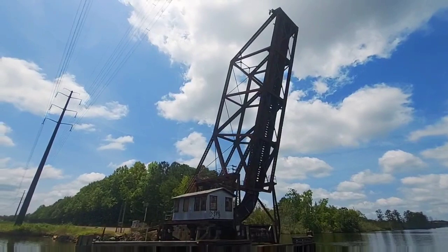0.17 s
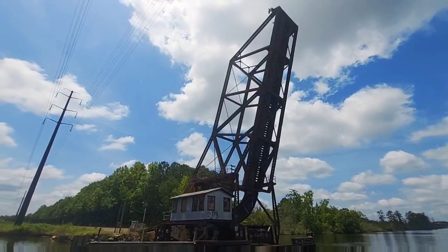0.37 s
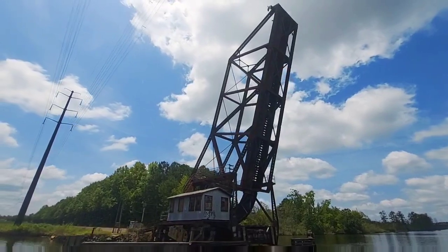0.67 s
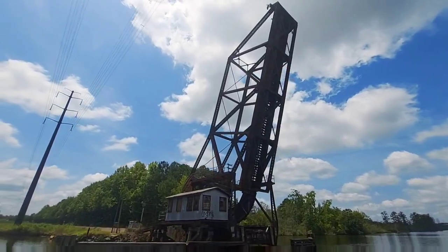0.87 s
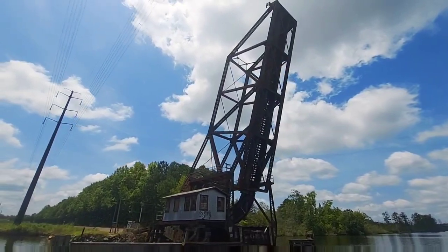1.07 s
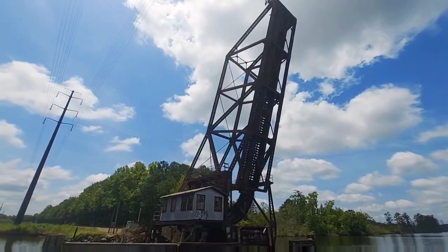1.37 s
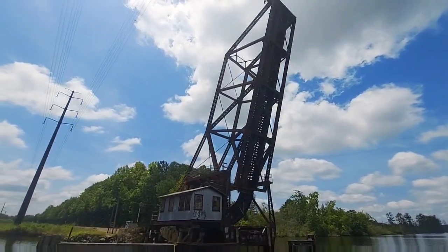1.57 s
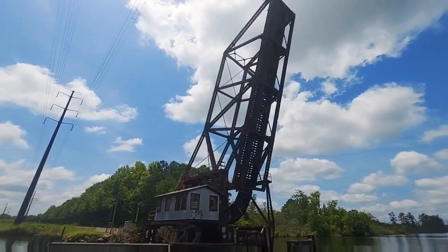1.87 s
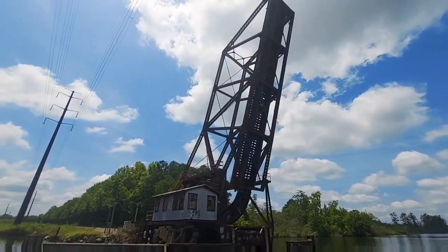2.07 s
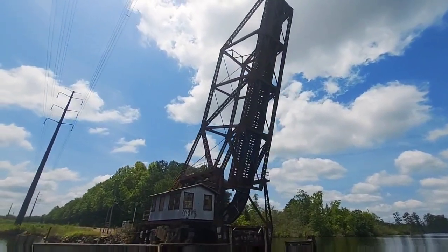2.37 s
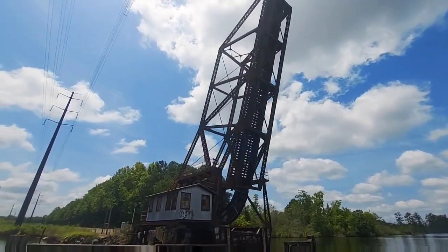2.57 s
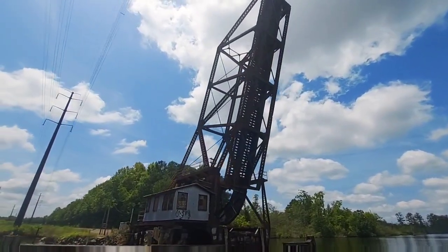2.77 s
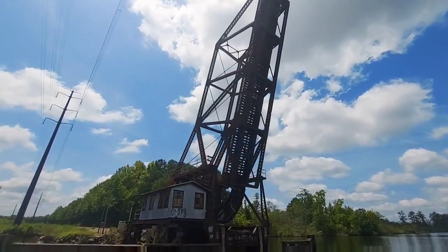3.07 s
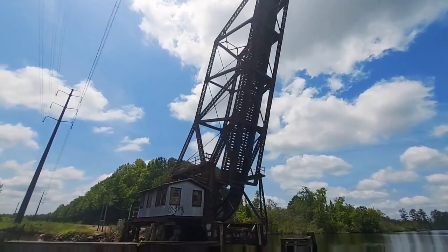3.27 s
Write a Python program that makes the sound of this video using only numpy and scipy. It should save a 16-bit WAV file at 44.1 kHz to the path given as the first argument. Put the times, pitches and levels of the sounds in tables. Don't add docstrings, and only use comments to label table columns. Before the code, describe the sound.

A steady motorboat engine clatter under lumpy low wind rumble, with faint fizzing water behind.

```python
import sys
import numpy as np
from scipy import signal
from scipy.fft import rfft, irfft
from scipy.io import wavfile
from scipy.ndimage import uniform_filter1d

SR = 44100
rng = np.random.default_rng(int(sys.argv[2]) if len(sys.argv) > 2 else 0)


def dump(signal):
    limited = np.clip(np.atleast_2d(signal).T, -1, 1)
    pcm = np.round(limited * 32767).astype(np.int16)
    wavfile.write(sys.argv[1], SR, pcm)


def convert_level_to_amplitude(level_db):
    exponent = np.asarray(level_db, float) / 20
    return 10 ** exponent


N = 150822

# time in seconds, pitch of the 18th firing order in Hz.
ENGINE_SPEED = [(0, 1180.5), (1.2, 1180), (2.2, 1178), (3.42, 1179)]
# multiple of the firing rate, left level in dB, right level in dB.
FIRING_TONES = [(1, -48, -55), (2, -48, -60), (3, -42.5, -58), (4, -48.5, -57.5), (5, -56, -59.5),
                (7, -63, -63), (8, -63, -67), (9, -66, -63), (18, -57.5, -73), (19, -74, -73),
                (21, -76, -75), (22, -59, -75), (23, -61.5, -76)]
# multiple of the firing rate, left level in dB, right level in dB.
GEAR_TONES = [(3.5, -62, -67), (6.26, -68, -64), (16.25, -75, -72), (21.75, -70, -80), (23.75, -77, -73),
              (26.14, -76, -68), (27.26, -80, -73), (28.26, -80, -70), (35.05, -78, -72), (41.13, -84, -72)]
# pitch in Hz, left dB per Hz, right dB per Hz.
EXHAUST_ROAR = [(25, -76, -86), (60, -58, -72), (120, -56, -66), (160, -58, -73), (380, -69, -69),
                (620, -68.5, -71), (850, -75, -78), (2500, -130, -130)]
# pitch in Hz, left dB per Hz, right dB per Hz.
CLATTER = [(388, -100, -100), (993, -69.5, -72.5), (1500, -73.5, -74.5), (2400, -83.5, -77),
           (3136, -84, -78), (4170, -100, -91.5), (5900, -105, -105), (9000, -150, -150)]
# pitch in Hz, width in Hz, left boost in dB, right boost in dB.
CASING_RINGS = [(1060, 140, -4, -4), (1190, 70, 3, 3), (1320, 100, -2, -1), (1690, 110, 3, 5),
                (1920, 110, -1, -3), (2100, 200, 2, 6), (2230, 80, 1, 3), (2460, 150, 8, 6),
                (2560, 60, 3, 3), (2950, 130, 7, 4)]
# time in seconds, extra force in dB.
HARD_KNOCKS = [(.098, 4), (.219, 4), (.386, 4), (.706, 6), (1.163, 4), (1.179, 5), (1.271, 4), (1.315, 5),
               (1.332, 6), (1.423, 5), (1.789, 4), (2.293, 3), (2.705, 3), (2.797, 4), (3.041, 5),
               (3.209, 4)]
# pitch in Hz, left dB per Hz, right dB per Hz.
WAKE_HISS = [(2430, -105, -105), (4300, -85.5, -86), (5000, -93, -82), (5850, -90.5, -82),
             (6480, -94.5, -87), (7430, -89.5, -90.5), (8750, -101, -105), (12000, -135, -140)]
# pitch in Hz, left dB per Hz, right dB per Hz.
SPRAY_FIZZ = [(6000, -120, -125), (8600, -102, -108), (10600, -100, -109), (11500, -98.5, -112),
              (13600, -97.5, -111), (16600, -101, -123), (15400, -150, -160)]
# time in seconds, level in dB.
SPRAY_STRENGTH = [(0, -77), (.25, -81.5), (.45, -79.5), (.68, -74.5), (.9, -80.5), (1.07, -75.5),
                  (1.35, -82), (1.9, -78), (2.2, -75), (2.58, -77), (2.85, -81.5), (3.0, -75.5),
                  (3.15, -78.5), (3.25, -74), (3.42, -73)]
# time in seconds, peak level in dB, pitch in Hz.
DROPS = [(.046, -66, 10500), (.439, -57, 12500), (0.796, -43, 6750), (1.064, -61, 12100),
         (1.711, -57, 14800), (1.727, -61, 11800), (2.084, -53, 6760), (2.139, -61, 12400),
         (2.598, -52, 14500), (2.976, -61, 13000), (3.047, -65, 10500), (3.081, -60, 12200),
         (3.203, -59, 11500), (3.406, -62, 12000)]
# pitch in Hz, left minus right in dB.
DROP_SIDE = [(2300, -8), (6000, -4), (7200, 8), (11000, 16)]
# middle in seconds, half length in seconds, pitch in Hz, level in dB.
GURGLE = (.25, .035, 520, -36.5)
# pitch in Hz, dB per Hz.
WIND_THUMP = [(20, -46), (45, 5), (75, 7), (135, 6), (190, -13), (300, -22.5), (500, -70), (900, -96)]
# pitch in Hz, left dB per Hz, right dB per Hz.
WIND_EDGE = [(60, -25, -20), (150, -8, -6), (220, 0, 0), (330, -6, -2), (450, -11, -4), (580, -22, -10),
             (750, -36, -32), (1200, -60, -60)]
# time in seconds, level in dB.
BREEZE = [(0, -16), (.15, -25.5), (.26, -25.5), (.44, -23.5), (.58, -26.5), (.8, -27.5), (1.1, -19.5),
          (1.25, -28.5), (1.45, -23), (1.62, -24.5), (1.75, -23), (2.1, -24), (2.35, -21), (2.55, -25),
          (2.82, -31), (3.0, -22.5), (3.2, -15), (3.42, -14)]
# middle in seconds, length in seconds, level in dB, pitch of the swing in Hz.
LEFT_GUSTS = [(.024, 0.01, -12.5, 111), (.085, 0.014, -12, 97), (.125, 0.028, -14.5, 119),
              (3.415, 0.013, -8, 140.5), (.298, 0.0091, -9, 124), (.345, 0.022, -15.5, 74),
              (.365, 0.023, -4.5, 100.5), (.388, 0.021, -6, 122), (.51, 0.0066, -7.5, 157),
              (.527, .022, -9, 69), (.552, 0.014, -13, 75), (.623, 0.0073, -13, 122),
              (.648, .02, -17.5, 85.5), (.708, 0.034, -14.5, 139), (.77, 0.0064, -13.5, 119),
              (.89, 0.022, -11.5, 104), (.954, 0.012, -12, 101), (1.022, 0.022, -10, 108),
              (1.05, 0.017, -14.5, 123), (1.278, .01, -14, 149), (1.298, 0.017, -9.5, 146),
              (1.321, 0.016, -5.5, 81), (1.415, 0.01, -10, 113), (1.465, 0.02, -9, 114),
              (1.482, 0.023, -12.5, 139), (1.51, 0.0074, -9, 207), (1.549, 0.021, -3.5, 124),
              (1.563, 0.014, -4, 84), (1.583, 0.02, -8.5, 129), (1.775, 0.029, -16.5, 139),
              (1.935, 0.022, -13.5, 125), (2.115, 0.023, -17.5, 168), (2.24, 0.035, -15, 121),
              (2.278, 0.01, -13, 87), (2.352, 0.006, -21, 90), (2.385, 0.022, -10.5, 97),
              (2.415, 0.02, -9, 100), (2.442, 0.018, -18, 173), (2.712, 0.041, -10, 130),
              (2.749, 0.016, -5.5, 73), (2.9, 0.007, -19, 150), (3.11, 0.0064, -6.5, 120),
              (3.139, 0.0073, 0.5, 178), (3.16, .018, 3, 93), (3.187, 0.012, -8, 172),
              (3.231, 0.0095, 0.5, 162), (3.249, 0.015, 1.5, 78.5), (3.285, 0.029, -7.5, 108),
              (3.332, 0.021, -7.5, 195.4), (3.37, 0.017, -2, 81)]
# middle in seconds, length in seconds, level in dB, pitch of the swing in Hz.
RIGHT_GUSTS = [(.53, .06, -40, 65), (.6, .04, -44, 130), (1.19, .08, -38, 95), (2.18, .03, -40, 50),
               (2.26, .09, -35, 90), (2.985, .04, -23, 80), (3.03, .045, -21, 115), (3.065, .03, -27, 190),
               (3.082, .03, -27, 340), (3.145, .07, -28, 110), (3.203, .018, -22, 210),
               (3.21, .03, -29, 400), (3.295, .04, -33, 260), (3.33, .025, -26, 480), (3.34, .05, -30, 80)]
# start in seconds, depth of the drop in dB.
GAIN_DROPS = [
    (.39, -0.84),
    (1.59, 1.5),
    (3.16, 1.5),
]

LAG_S = .00036


def curve(points):
    times, values = np.transpose(points)
    return np.interp(np.arange(N) / SR, times, values)


def evened(x):
    return x / np.sqrt(np.mean(x ** 2) + 1e-20)


def colour(x, table, col=1):
    p = np.array(table)
    hz = np.fft.rfftfreq(N, 1 / SR)
    db = np.interp(np.log(hz + 1), np.log(p[:, 0] + 1), p[:, col])
    return irfft(rfft(x) * convert_level_to_amplitude(db) * np.sqrt(SR / 2), N)


def slow(rate_hz):
    t = np.arange(N // 64 + 2) * 64 / SR
    f = np.geomspace(rate_hz / 15, rate_hz, num=24)[:, None]
    waves = np.sin(2 * np.pi * (f * t + rng.random((24, 1)))) / np.sqrt(f)
    return np.interp(np.arange(N) / SR, t, evened(waves.sum(0)))


def ports(a, b, same):
    left = same * a + np.sqrt(1 - same ** 2) * b
    return left, np.roll(a, round(LAG_S * SR))


def patchy(x, patch_db, flicker_db):
    z = signal.stft(x, nperseg=256)[2]
    p = rng.standard_normal(z.shape[::-1]).T
    patches = evened(uniform_filter1d(uniform_filter1d(p, size=7, axis=0), size=18, axis=1))
    flicker = evened(p.mean(0))
    return signal.istft(z * convert_level_to_amplitude(patch_db * patches + flicker_db * flicker), nperseg=256)[1][:N]


def engine_tones(firings):
    out = np.zeros((2, N))
    firing_hz = firings[-1] * SR / N
    for k, left_db, right_db in FIRING_TONES + GEAR_TONES:
        wander = .045 * (1 + k / 30) * slow(15.0)
        phase = 2 * np.pi * (k * firings + rng.random() + wander)
        lag = 2 * np.pi * k * LAG_S * firing_hz * (k > 10 and k % 1 == 0)
        level = convert_level_to_amplitude(9.7 + 1.7 * slow(50) + [[left_db], [right_db]])
        out += level * np.sqrt(2) * np.sin([phase, phase - lag])
    return out


def firing_bursts(firings):
    turns = firings + 1 - .2
    force_db = 1.5 * rng.standard_normal(N // 400)
    for s, extra_db in HARD_KNOCKS:
        force_db[int(turns[round((s + .002) * SR)])] = extra_db
    cycle_db = 1.0 * np.cos(np.pi * np.floor(turns) / 3)
    force = convert_level_to_amplitude(force_db)[turns.astype(int)] * convert_level_to_amplitude(cycle_db)
    burst = evened(np.exp(-(turns % 1) / .35))
    share = .42
    return evened(1 - share + share * force * burst)


def engine():
    firings = np.cumsum(curve(ENGINE_SPEED) / 18) / SR
    out = engine_tones(firings)
    gate = firing_bursts(firings)
    a, b, c, d = rng.standard_normal((N, 4)).T
    hz = np.fft.rfftfreq(N, 1 / SR)
    upper = 1 / (1 + (1800 / (hz + 1)) ** 8)

    def knocking(noise):
        return irfft(np.sqrt(upper) * rfft(noise * gate) + np.sqrt(1 - upper) * rfft(noise[::-1]), N)

    knocks = ports(patchy(knocking(a), 1.1, 0.5), patchy(knocking(b), 1.1, 1.0), .6)
    roars = 0.47 * c + 0.92 * d, c
    for ch in (0, 1):
        ring_db = 0
        for row in CASING_RINGS:
            ring_db = ring_db + row[2 + ch] / (1 + (2 * (hz - row[0]) / row[1]) ** 2)
        clatter = colour(knocks[ch], CLATTER, col=1 + ch)
        out[ch] += irfft(rfft(clatter) * convert_level_to_amplitude(ring_db), N)
        out[ch] += colour(roars[ch], EXHAUST_ROAR, col=1 + ch)
    return out


def foam():
    a, b, c, d = rng.standard_normal((N, 4)).T
    tick_size = convert_level_to_amplitude(6.4 * np.minimum(rng.exponential(1, (N, 2)), 4).T)
    ticks = tick_size * (rng.random((N, 2)).T < 600 / SR)
    hiss = ports(patchy(a + 0.22 * evened(ticks[0]), 1.3, 0.93), patchy(b, 1.3, 0.55), 0.17)
    fizz = patchy(c + 0.35 * evened(ticks[1]), 2.2, 0.79), patchy(d, 1.5, 1.2)
    spray_db = curve(SPRAY_STRENGTH)
    spray = convert_level_to_amplitude(spray_db - np.mean(spray_db))
    out = np.zeros((2, N))
    for ch in (0, 1):
        out[ch] = colour(hiss[ch], WAKE_HISS, col=1 + ch)
        out[ch] += spray * colour(fizz[ch], SPRAY_FIZZ, col=1 + ch)
    return out * convert_level_to_amplitude(0.42 * slow(80.0))


def add_drops(out):
    t = np.arange(300) / SR
    for s, peak_db, pitch_hz in DROPS:
        side_db = np.interp(pitch_hz, *np.transpose(DROP_SIDE))
        cycles = pitch_hz * t
        swell = cycles * np.exp(1 - cycles / 2.3) / 0.51
        drop = swell * np.sin(2 * np.pi * cycles * (1 + 60 * t))
        at = round((s - .0005) * SR)
        out[:, at:at + 300] += convert_level_to_amplitude(peak_db + np.array([[.5], [-.5]]) * side_db) * drop


def gurgle():
    s, half_s, pitch_hz, db = GURGLE
    t = np.arange(N) / SR - s
    return convert_level_to_amplitude(db) * np.exp(-(t / half_s) ** 2) * np.sin(2 * np.pi * pitch_hz * t)


def wake():
    out = foam()
    add_drops(out)
    return out + gurgle()


def eddies(table, steady_s, col=1):
    x = colour(rng.standard_normal(N), table, col=col)
    n = round(steady_s * SR)
    power = uniform_filter1d(uniform_filter1d(x ** 2, n), n)
    return evened(x / np.sqrt(power + 0.37 * np.mean(x ** 2)))


def buffet(gusts, breeze, edge_db, port):
    t = np.arange(N) / SR
    thump_power = breeze ** 2
    edge_power = (breeze * convert_level_to_amplitude(-59)) ** 2
    swing = 0
    drift = np.cumsum(np.exp(.1 * slow(60.0))) / SR
    signs = rng.choice([-1, 1], size=len(gusts))
    for (s, length_s, db, pitch_hz), sign in zip(gusts, signs):
        shape = convert_level_to_amplitude(db) * np.exp(-abs(2 * (t - s) / length_s) ** 2.64 / 2)
        phase = 2 * np.pi * pitch_hz * (drift - drift[round(s * SR)])
        swing = swing + sign * shape * (np.cos(phase) + 0.14 * np.sin(2 * phase))
        thump_power = thump_power + (shape * convert_level_to_amplitude(-10)) ** 2
        edge_power = edge_power + (shape * convert_level_to_amplitude(edge_db)) ** 2
    thump = np.sqrt(thump_power) * eddies(WIND_THUMP, 0.013)
    edge = np.sqrt(edge_power) * eddies(WIND_EDGE, 0.021, col=1 + port)
    return swing + thump + edge


def wind():
    left_breeze = convert_level_to_amplitude(curve(BREEZE) + 2 * slow(30.0))
    right_breeze = convert_level_to_amplitude(-56 + 4.0 * slow(15.0))
    left = buffet(LEFT_GUSTS, left_breeze, -18.5, port=0)
    right = buffet(RIGHT_GUSTS, right_breeze, -4, port=1)
    return np.array([left, right + convert_level_to_amplitude(-50) * left])


def scene():
    return engine() + wake() + wind()


def roll_off(x):
    return signal.sosfilt(signal.butter(12, 16010, fs=SR, output="sos"), x)


def record(dry):
    t = np.arange(N) / SR
    duck_db = 7.0
    for s, depth_db in GAIN_DROPS:
        fall = np.clip((t - s) / 0.074, 0, 1)
        recovery = np.clip(1 - ((t - s) / 1.22) ** 2, 0, 1)
        duck_db = duck_db + depth_db * fall * recovery
    held = np.pad(dry, [(0, 0), (400, 400)], "reflect")
    treble_cut = signal.firwin(801, 15765, fs=SR)[None]
    mix = signal.oaconvolve(held, treble_cut, "valid") / convert_level_to_amplitude(duck_db)
    return roll_off(mix)


dry = scene()
out = record(dry)
dump(out)
```